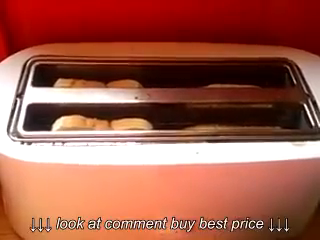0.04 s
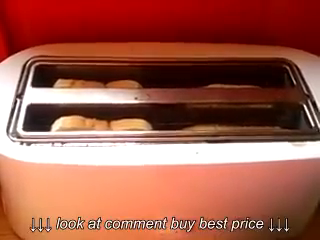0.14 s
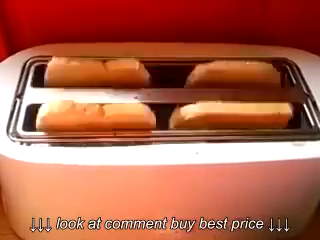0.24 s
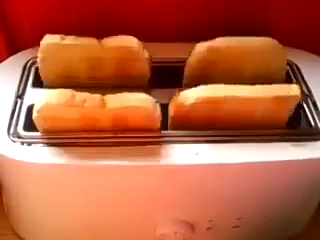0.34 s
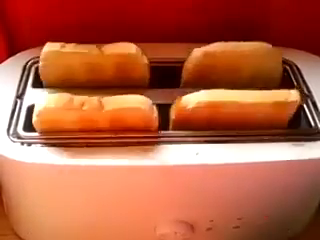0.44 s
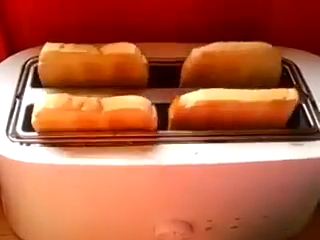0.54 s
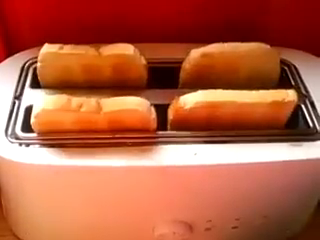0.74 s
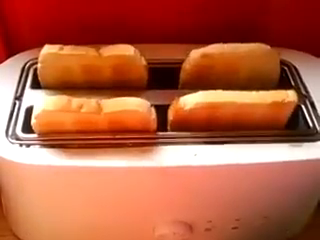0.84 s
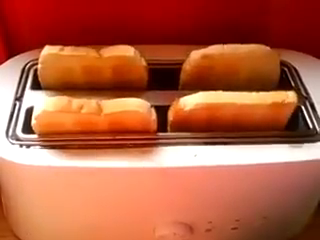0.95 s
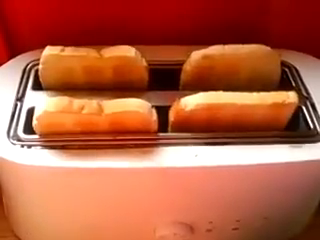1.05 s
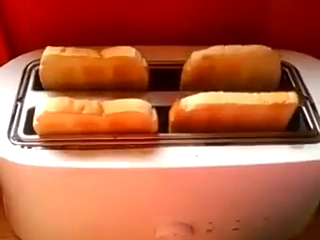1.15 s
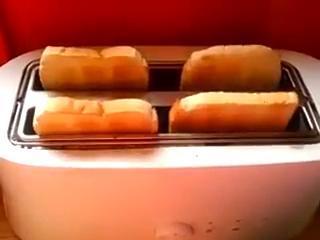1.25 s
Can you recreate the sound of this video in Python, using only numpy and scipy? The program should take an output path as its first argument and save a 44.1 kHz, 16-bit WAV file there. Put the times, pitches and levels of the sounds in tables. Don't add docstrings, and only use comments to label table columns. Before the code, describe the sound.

A toaster pops up: bright latch crack, scraping metal jangle, hard clank, short rattling decay.

```python
import sys
import numpy as np
from scipy import signal
from scipy.io import wavfile

SR = 44100
rng = np.random.default_rng(int(sys.argv[2]) if len(sys.argv) > 2 else 0)


def file_out(sig):
    cols = np.atleast_2d(sig).T
    lim = np.clip(cols, -1, 1)
    pcm = np.round(lim * 32767).astype(np.int16)
    wavfile.write(sys.argv[1], SR, pcm)


def nominal_scale(level):
    x = np.asarray(level, float) / 20
    return 10 ** x


N = 57330
TIME = np.arange(N) / SR


def rms_one(x):
    return x / np.sqrt(np.mean(x ** 2) + 1e-20)


def envelope(rows):
    s, db = np.transpose(rows)
    return nominal_scale(np.interp(TIME, s, db, right=-120))


def band(x, low_hz, high_hz):
    sos = signal.butter(4, [low_hz, high_hz], "band", fs=SR, output="sos")
    return rms_one(signal.sosfilt(sos, x))


def colour(x, points):
    hz, db = np.transpose(points)
    edges = 22 * 2 ** np.arange(0, 9.9, .5)
    out = 0
    for k, (lo, hi) in enumerate(zip(edges, edges[1:])):
        gain = nominal_scale(np.interp(np.log(lo * hi) / 2, np.log(hz), db))
        sos = signal.butter(2, [lo, hi], "band", fs=SR, output="sos")
        out = out + (-1) ** k * gain * signal.sosfilt(sos, x)
    return out


def resonate(x, peaks, widen):
    out = 0
    for k, (hz, width, db) in enumerate(peaks):
        r = np.exp(-np.pi * max(width * widen, 25) / SR)
        poles = [1, -2 * r * np.cos(2 * np.pi * hz / SR), r * r]
        out = out + (-1) ** k * nominal_scale(db) * signal.lfilter([1 - r * r, 0, r * r - 1], poles, x)
    return out


def grains(per_s, spread_db):
    size = nominal_scale(spread_db * np.minimum(rng.exponential(1, N), 4)) * rng.choice([-1, 1], N)
    return rms_one(size * (rng.random(N) < per_s / SR))


def hits(rows, t60_s):
    out = np.zeros(N)
    for s, db in rows:
        out += nominal_scale(db - 60 * np.maximum(TIME - s, 0) / t60_s) * (TIME >= s)
    return out * rng.standard_normal(N)


def soft_rings(rows):
    rise_s = 0.0044
    out = 0
    for s, db, hz, t60 in rows:
        t = np.maximum(TIME - s, 0)
        onset = (1 - np.exp(-t / rise_s)) ** 2
        out = out + nominal_scale(db - 60 * t / t60) * onset * np.sin(2 * np.pi * hz * t)
    return out


def metal_part(force, steady, points, peaks, ring_db, widen):
    both = np.array([force, steady])
    broad, rings = colour(both, points), resonate(both, peaks, widen)
    return broad[0] / broad[1].std() + nominal_scale(ring_db) * rings[0] / rings[1].std()


# (frequency [Hz], level [dB])
HISS_COLOUR = [(15, -40), (25, -13), (101, -1), (264, -11), (326, -11), (363, -13.5), (729, -17.5),
               (811, -18.5), (15000, -28)]
# (time [s], peak level [dB])
ROOM_TICKS = [
    (.158, -55),
    (.757, -51.5),
    (.795, -55),
    (.83, -51),
    (.935, -52),
    (.962, -52),
    (1.0, -56),
    (1.04, -55),
]


def background():
    hiss = nominal_scale(-56) * rms_one(colour(rng.standard_normal(N + SR), HISS_COLOUR)[SR:])
    knots = rng.standard_normal(200)
    flutter_db = -0.3 * np.interp(TIME * 21, np.arange(200), knots)
    hiss = hiss * nominal_scale(flutter_db) + hits(ROOM_TICKS, t60_s=0.033)
    dip_s, dip_len_s = .235, .008
    dull = signal.sosfiltfilt(signal.butter(6, 6000, fs=SR, output="sos"), hiss)
    dip = np.clip(2 - 4 * abs(TIME - dip_s) / dip_len_s, 0, 1)
    rustle_s, rustle_len_s = 1.234, 0.037
    swell = np.exp(-((TIME - rustle_s) / rustle_len_s) ** 2)
    rustle = nominal_scale(-65) * swell * band(rng.standard_normal(N), 2250, 6000)
    return hiss + dip * (dull - hiss) + rustle


# (time [s], level [dB])
HOUSE_FADE = [(.3, -77), (.5, -46), (.7, -58.5), (1.0, -60.5), (1.31, -67.5)]


def house():
    return envelope(HOUSE_FADE) * band(rng.standard_normal(N), 186.3, 797)


def room(x):
    t60_s, wall_cut_hz = 0.38, 4240
    out, dull = np.zeros(N), np.exp(-2 * np.pi * wall_cut_hz / SR)
    lags = (rng.uniform(.012, .035, 10) * SR).astype(int)
    for k, lag in enumerate(lags):
        loop, gain, state = x.copy(), nominal_scale(-60 * lag / SR / t60_s), [0.]
        for i in range(lag, N, lag):
            back, state = signal.lfilter([gain * (1 - dull)], [1, -dull], loop[i - lag:i], zi=state)
            loop[i:i + lag] += back[:N - i]
        out += (loop - x) * (-1) ** k
    return out


# (time [s], peak level [dB], pitch [Hz], t60 [s])
FOOT_BUMPS = [
    (0.2309, -34.5, 279.4, 0.14),
    (0.259, -30, 300, 0.08),
    (0.294, -38.5, 71.6, .15),
    (.345, -30, 119.7, 0.16),
    (.398, -23, 262.7, .1),
    (0.429, -32, 123, 0.11),
    (0.469, -32, 160.6, 0.11),
    (.495, -37, 74, 0.16),
    (.555, -32, 128.6, 0.071),
    (.56, -40, 70, 0.089),
]


def rocking():
    return soft_rings(FOOT_BUMPS)


# (time [s], peak level [dB], pitch [Hz], t60 [s])
PANEL_BOOMS = [
    (0.257, -34, 790, .2),
    (.405, -23.5, 625, 0.14),
    (.418, -22.5, 447, 0.11),
    (.41, -27.5, 805, .1),
    (.462, -26.5, 808, .12),
    (.24, -30, 1180, 0.085),
    (0.37, -30, 1500, 0.13),
    (0.38, -30.5, 2400, 0.18),
]


def panels():
    return soft_rings(PANEL_BOOMS)


# (frequency [Hz], width [Hz], level [dB])
WIRE_MODES = [(2090, 110, -1), (2615, 57, 10), (5400, 280, -1), (6030, 350, 5.5), (4900, 160, -2.5),
              (10000, 170, -8.5), (12800, 300, -7)]
# (time [s], level [dB])
WIRE_BUZZ = [(.403, -79), (.412, -36), (.47, -34.5), (.55, -48), (.66, -60), (.75, -82)]


def wires():
    return envelope(WIRE_BUZZ) * rms_one(resonate(grains(9000.0, 2.9), WIRE_MODES, widen=1.04))


# (time [s], level [dB])
LATCH_CREEP = [(.208, -72), (.2195, -53), (.2205, -43.5), (.226, -61), (.232, -56), (.24, -45)]


def latch():
    return envelope(LATCH_CREEP) * band(grains(7300.0, 1.5), 850, 5830)


# (time [s], peak level [dB])
LATCH_SPITS = [
    (.2402, -22.5),
    (.2735, -24),
    (.277, -26),
]


def crack():
    out = np.diff(hits(LATCH_SPITS, t60_s=0.022), prepend=0)
    out[int(.2402 * SR) + np.arange(4)] += nominal_scale(-17) * np.array([-1, -1, 1, 1])
    return out


# (frequency [Hz], level [dB], t60 [s])
STOP_MODES = [(1577, -20.5, 0.035), (2422, -19, 0.034), (2810, -27, 0.037), (3350, -16.5, 0.014),
              (4300, -38, .015)]


def stop():
    stop_s, rise_s = .4056, .0005
    t = np.maximum(TIME - stop_s, 0)
    rings = 0
    for k, (hz, db, t60) in enumerate(STOP_MODES):
        rings = rings + (-1) ** k * nominal_scale(db - 60 * t / t60) * np.sin(2 * np.pi * hz * t)
    return rings * (1 - np.exp(-t / rise_s))


# (time [s], peak level [dB])
STOP_BLOWS = [
    (.4055, -17.5),
    (.4115, -28),
    (.428, -13.5),
    (.446, -17.5),
]
# (time [s], level [dB])
CASE_SHAKE = [(.236, -82), (.243, -36.5), (.35, -32.5), (.404, -34), (.412, -30), (.455, -28), (.54, -44),
              (.62, -53), (.75, -64.5)]
# (frequency [Hz], width [Hz], level [dB])
CASE_MODES = [(240, 30, -1), (437.3, 27, 0.5), (632, 30, -3), (805.3, 25, 1.5), (980, 40, -7),
              (1270, 37, -7), (1477.4, 31, 3.5), (1454, 33, -10), (1705, 28, -4.5), (2090, 32, 2.5),
              (2354, 114, 5), (2750, 50, -16), (3580, 79, -2)]
# (frequency [Hz], level per Hz [dB])
CASE_TONE = [(80, -18), (200, -4), (500, -1), (1500, -5), (2600, 1.5), (3500, -20), (7000, -20.5),
             (15000, -20)]


def case():
    touch = grains(9000.0, 2.04)
    force = envelope(CASE_SHAKE) * touch + nominal_scale(-11) * hits(STOP_BLOWS, t60_s=0.041)
    return metal_part(force, touch, CASE_TONE, CASE_MODES, ring_db=-5, widen=0.59)


# (time [s], peak level [dB])
RAIL_SNAPS = [
    (.2401, -15),
    (.2725, -17.5),
    (.2755, -22),
    (.2915, -20),
    (.4055, -20),
]
# (time [s], level [dB])
RAIL_SCRAPE = [(.2395, -76), (.2405, -27.5), (.262, -26.5), (.3, -25), (.36, -27.5), (.402, -33.5),
               (.42, -32.5), (.545, -41.5), (.66, -67)]
# (frequency [Hz], width [Hz], level [dB])
RAIL_MODES = [(794, 18, -3), (1198, 41, 0), (1510, 57, -14), (2340, 44, -4.5), (3715, 65, 2),
              (3600, 60, -8), (4046, 70, 2.5), (4460, 92, 9), (4520, 180, 9), (4760, 130, -7),
              (5360, 27, -15), (6430, 45, 3.5), (6380, 60, -4.5), (7880, 55, -22)]
# (frequency [Hz], level per Hz [dB])
RAIL_TONE = [(150, -9), (400, -10), (1200, -9.5), (2800, -11.5), (4500, 1.5), (6500, -6.5), (9000, -13.5),
             (15000, -14.5)]


def carriage():
    touch = grains(20000.0, 0.98)
    force = envelope(RAIL_SCRAPE) * touch + nominal_scale(-7.5) * hits(RAIL_SNAPS, t60_s=0.041)
    return metal_part(force, touch, RAIL_TONE, RAIL_MODES, ring_db=-5, widen=1.13)


def scene():
    toaster = latch() + crack() + carriage() + case() + stop() + rocking() + panels() + wires()
    toaster = signal.sosfilt(signal.butter(2, 50, "high", fs=SR, output="sos"), toaster)
    mono = toaster + nominal_scale(-16) * room(toaster) + background() + house()
    return np.array([mono, mono])


def band_limit(x):
    return signal.sosfilt(signal.butter(12, 16270, fs=SR, output="sos"), x)


def record(dry):
    main = signal.sosfilt(signal.cheby2(20, 60, 15400, fs=SR, output="sos"), dry)
    top = signal.sosfilt(signal.cheby2(12, 60, 16600, fs=SR, output="sos"), dry)
    at_crack = abs(TIME - .2402 - .002) < .003
    mix = main + nominal_scale(-46 + 40 * at_crack) * top
    wide_s, wide_len_s = 0.3428, 0.045
    phase = np.clip((TIME - wide_s) / wide_len_s, -.5, .5)
    sos = signal.cheby2(8, 60, [4950, 6500], "band", fs=SR, output="sos")
    wide = rms_one(signal.sosfilt(sos, rng.standard_normal(N)))
    mix = mix + nominal_scale(-31.5) * np.cos(np.pi * phase) ** 2 * wide * [[1], [-1]]
    return band_limit(mix)


dry = scene()
out = record(dry)
file_out(out)
```